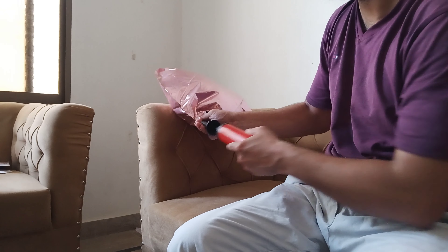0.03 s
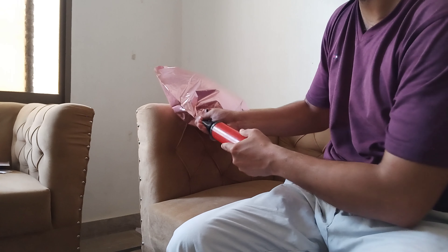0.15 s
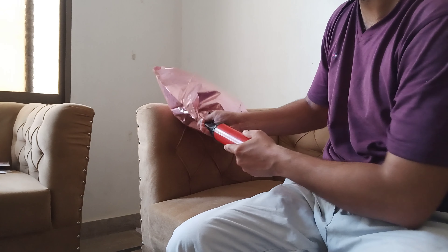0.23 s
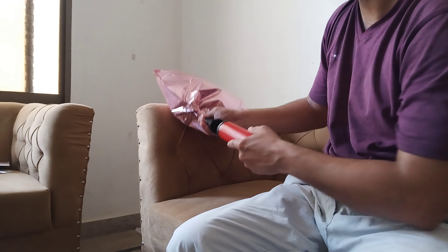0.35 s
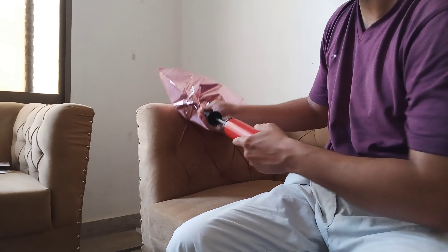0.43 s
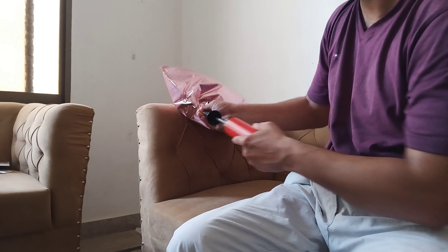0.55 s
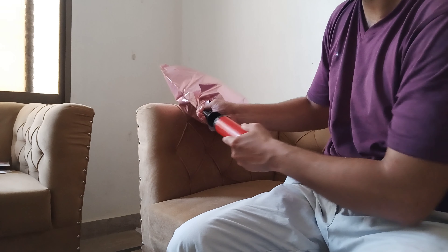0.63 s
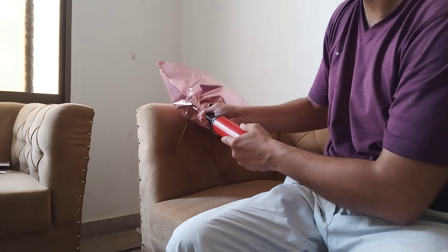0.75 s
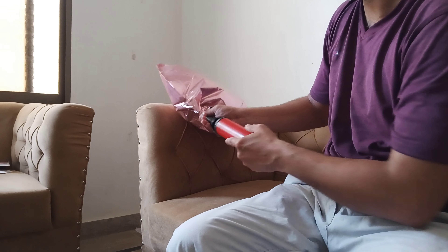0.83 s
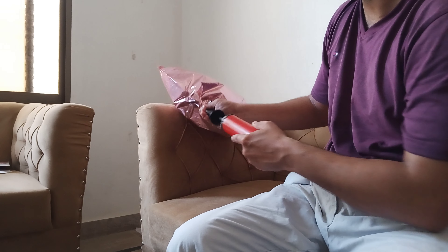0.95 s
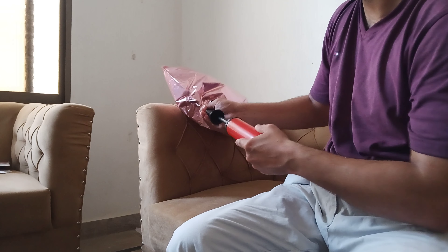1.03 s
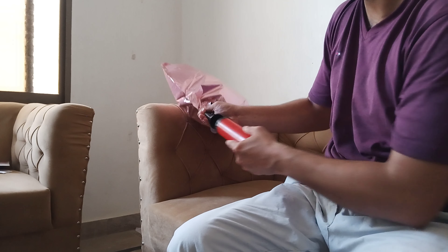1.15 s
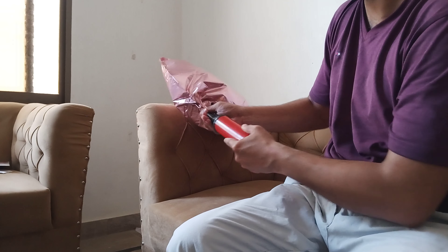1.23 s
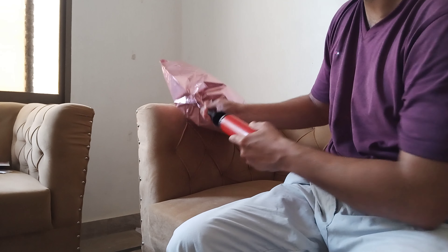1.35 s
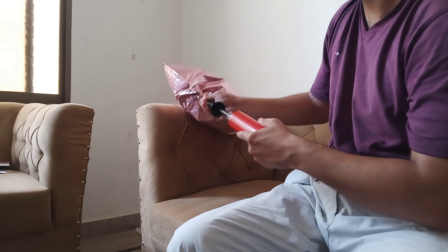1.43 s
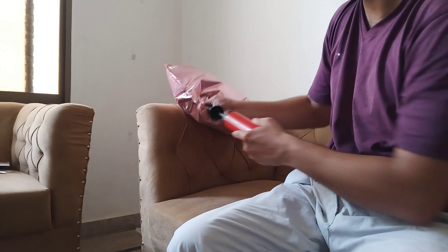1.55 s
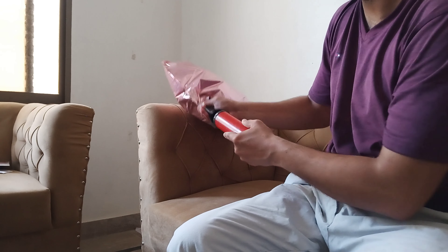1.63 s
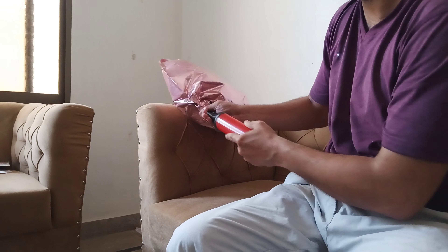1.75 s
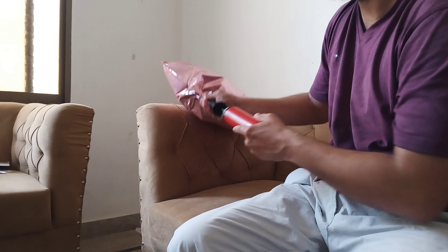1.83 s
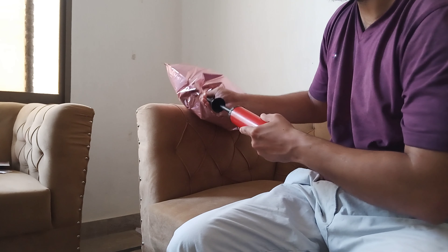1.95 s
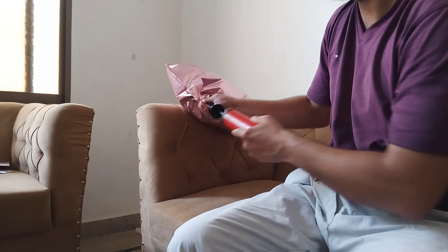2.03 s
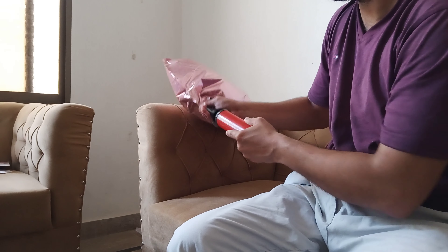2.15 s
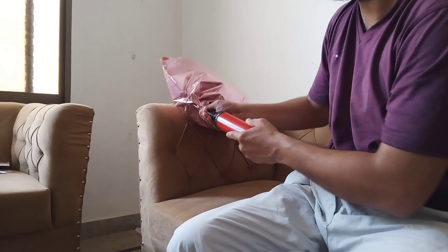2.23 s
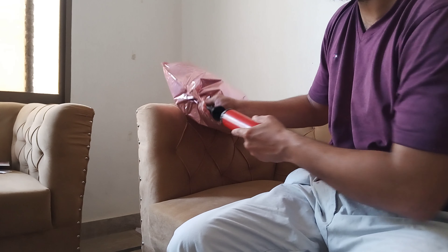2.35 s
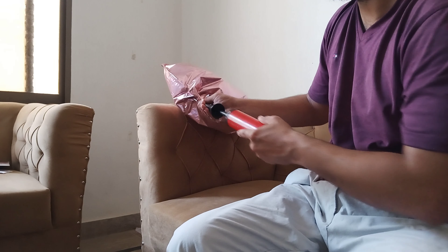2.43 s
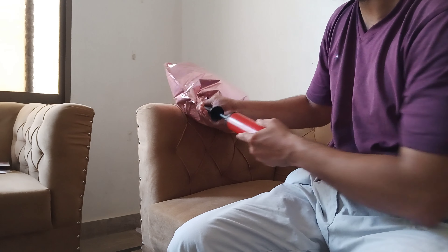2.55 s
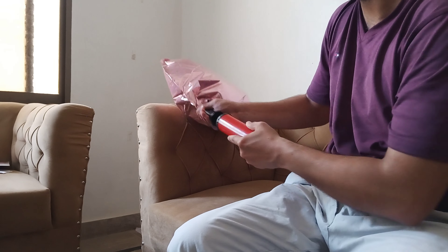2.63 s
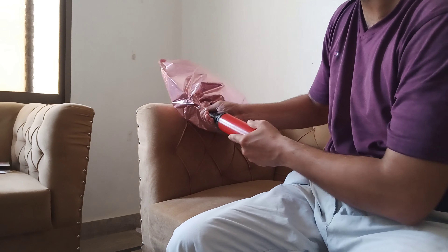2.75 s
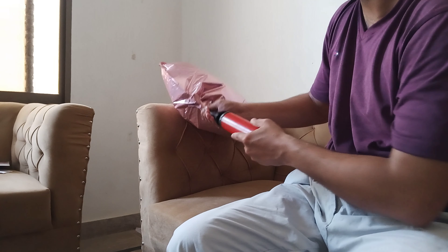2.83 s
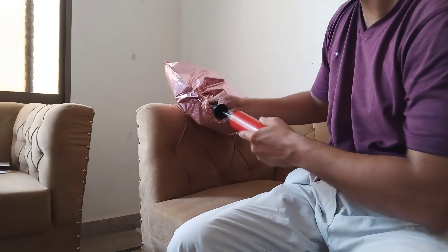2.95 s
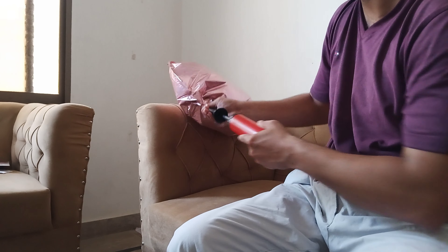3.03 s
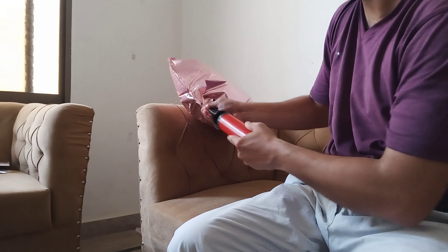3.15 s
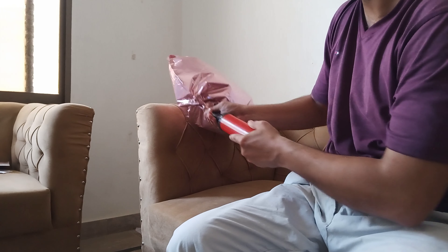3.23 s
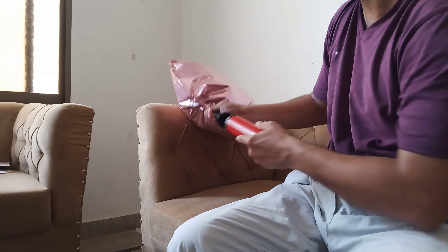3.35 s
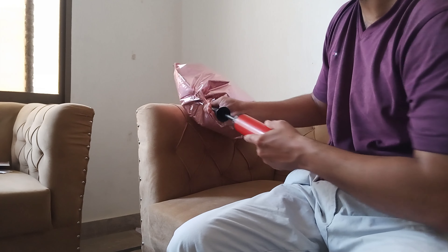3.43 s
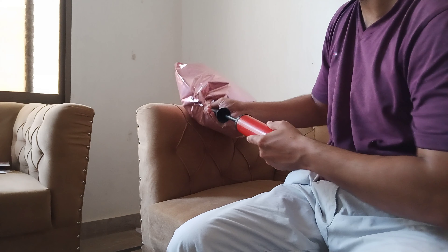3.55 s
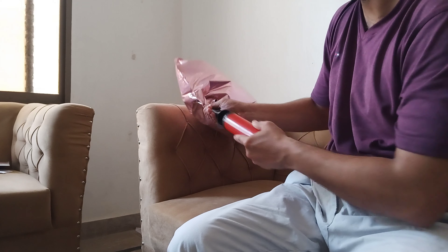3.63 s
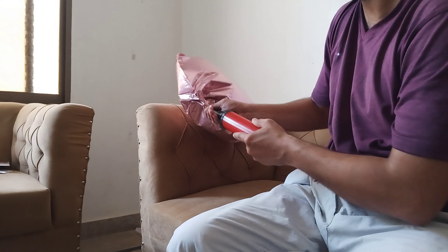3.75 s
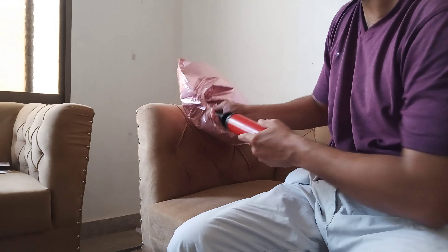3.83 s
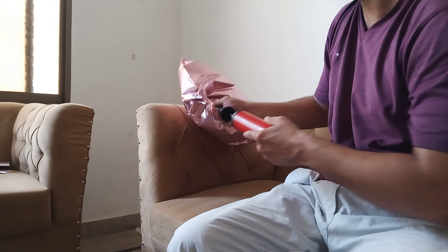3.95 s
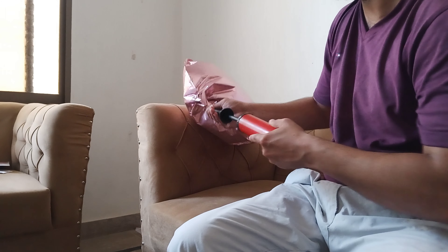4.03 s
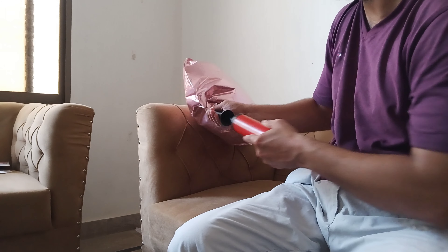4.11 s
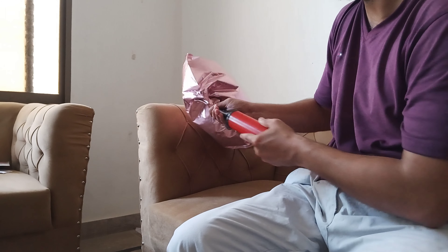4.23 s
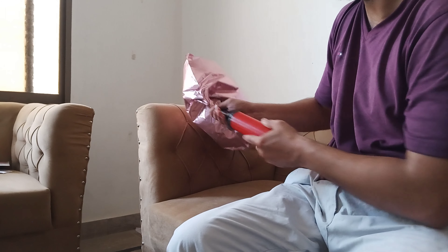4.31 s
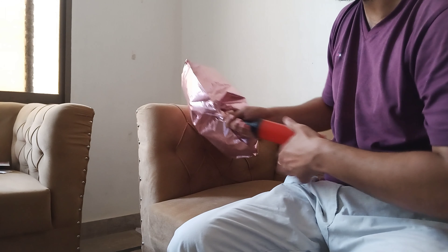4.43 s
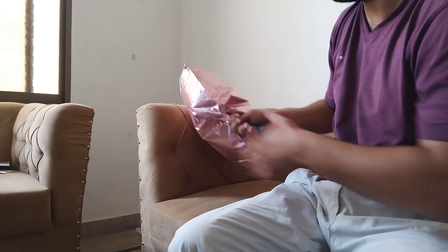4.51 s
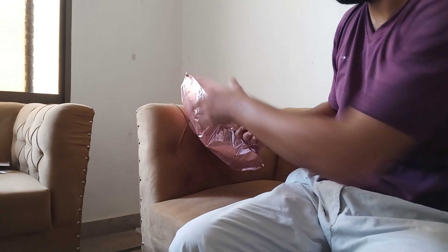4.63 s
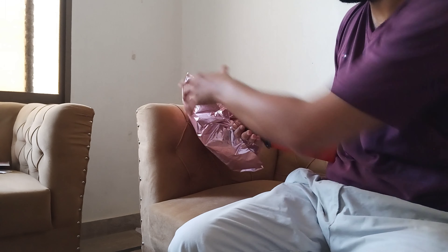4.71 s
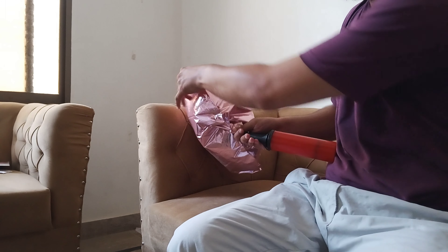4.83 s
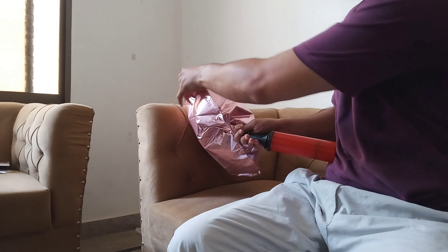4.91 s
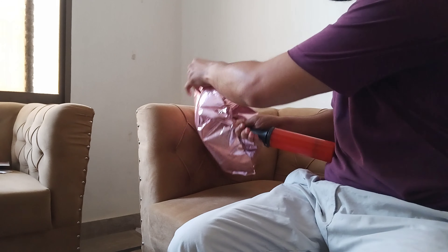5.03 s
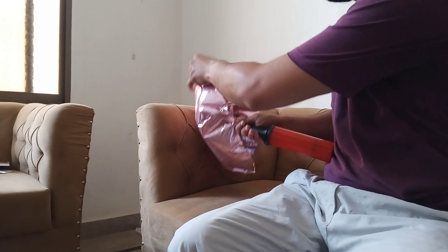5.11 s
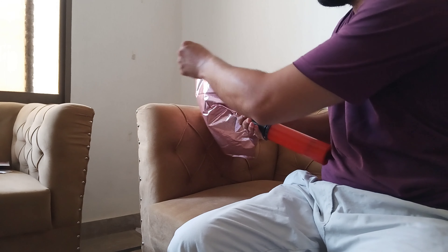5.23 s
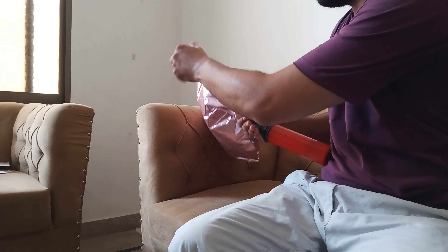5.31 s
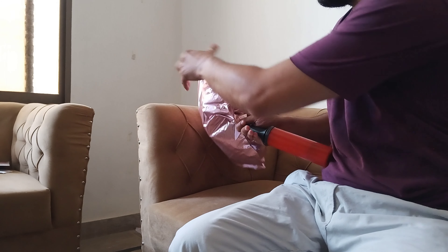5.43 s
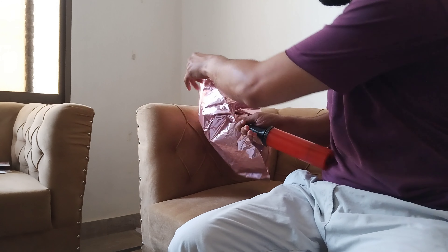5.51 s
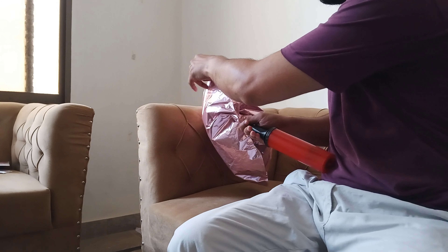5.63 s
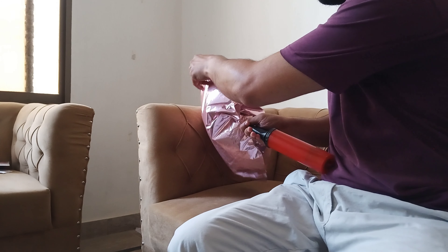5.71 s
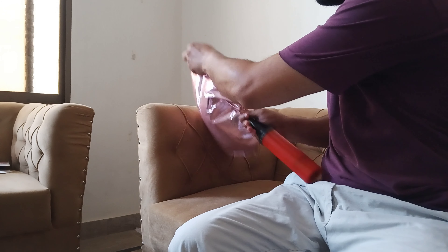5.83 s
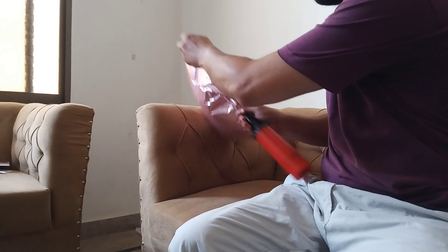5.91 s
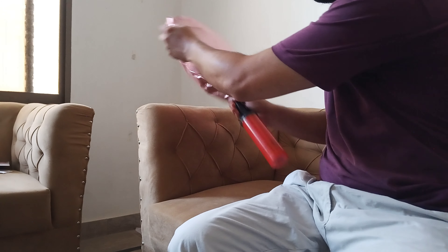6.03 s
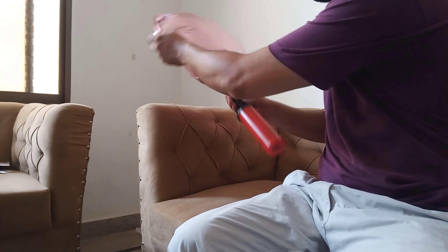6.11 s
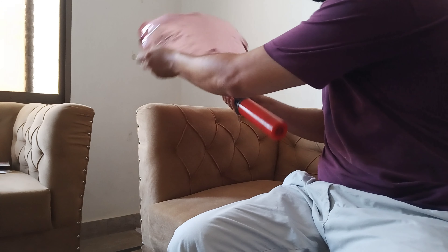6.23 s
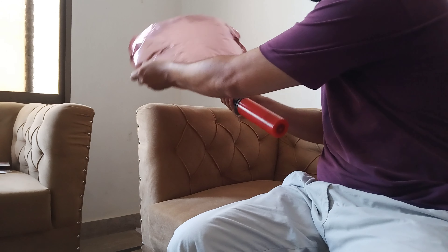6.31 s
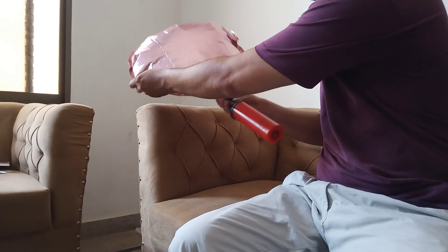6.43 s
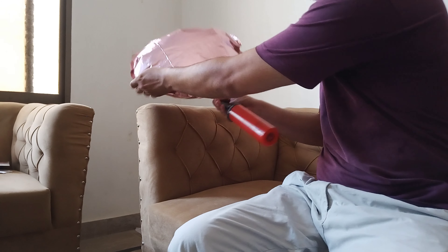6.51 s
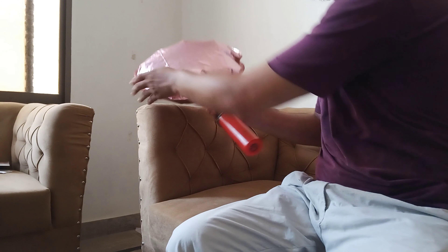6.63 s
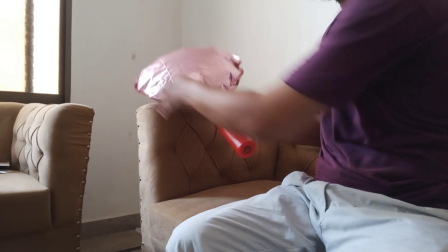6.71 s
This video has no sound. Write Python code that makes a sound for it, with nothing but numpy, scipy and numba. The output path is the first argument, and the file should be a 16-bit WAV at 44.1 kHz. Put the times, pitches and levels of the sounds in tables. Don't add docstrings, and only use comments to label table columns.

```python
import sys
import numpy as np
from scipy import signal
from scipy.fft import rfft, irfft, next_fast_len
from scipy.io import wavfile
from scipy.ndimage import uniform_filter1d
from numba import njit

SR = 44100
rng = np.random.default_rng(int(sys.argv[2]) if len(sys.argv) > 2 else 0)


def wrap_up_sound(samples):
    columns = np.atleast_2d(samples).T
    tamed = np.clip(columns, -1, 1)
    steps = np.round(tamed * 32767).astype(np.int16)
    wavfile.write(sys.argv[1], SR, steps)


def voltage_ratio(level):
    return 10 ** (np.asarray(level, float) / 20)


N = 298557
TIME = np.arange(N) / SR
PUMP_ENDS_S = 4.25


# frequency in Hz, density in dB per Hz.
JET_SPECTRUM = [(120, -46), (235, -5.5), (380, -11), (790, -5), (1090, -12.5), (1570, -6.5), (3200, -2),
                (6000, -1), (16000, -4)]
# middle in s, length in s, pitch in Hz, level in dB over jet.
LOW_CAVITY = [(0.005, 0.052, 580, 14), (0.205, 0.13, 600, 18), (0.277, .04, 600, -1),
              (0.329, 0.026, 1010, 12), (0.362, 0.023, 520, -3), (0.41, 0.072, 472, 17),
              (0.856, .12, 808, 14.5), (1.193, 0.075, 700, 12.5), (1.285, 0.037, 613, 9.5),
              (1.355, 0.092, 780, 3.5), (1.66, 0.059, 520, 11), (1.79, 0.03, 845, 8),
              (1.82, 0.2, 1000, 6.5), (2.284, .08, 804, 10), (2.397, 0.12, 750, 7), (2.81, 0.063, 875, 0),
              (2.884, 0.058, 990, 5), (3.238, 0.069, 564, 16.5), (3.403, 0.07, 850, 7.5),
              (3.853, 0.088, 910, 4.5), (4.2, 0.099, 592, 14.5)]
# middle in s, length in s, pitch in Hz, level in dB over jet.
HIGH_CAVITY = [(.19, 0.07, 1500, 12.5), (.35, 0.11, 1520, 0.5), (.86, 0.17, 1560, 4.5),
               (1.225, .03, 1800, 12.5), (1.26, 0.038, 1900, 7), (1.37, 0.22, 1440, -2),
               (1.81, 0.097, 1730, 2.5), (2.28, 0.23, 1600, 5), (2.801, 0.14, 1380, 3),
               (3.24, 0.046, 1800, 14.5), (3.27, .03, 1730, 10.5), (3.35, 0.26, 1240, -2),
               (3.41, 0.22, 1330, 5), (3.88, 0.15, 1240, 7.5), (3.97, 0.089, 1360, -0.5),
               (4.12, 0.16, 1290, 10)]
# middle in s, length in s, pitch in Hz, level in dB over jet.
NOZZLE_CAVITY = [(.37, 0.15, 4420, -1.5), (.86, .1, 4020, -2.5), (1.3, 0.073, 2590, 0.5),
                 (1.765, 0.041, 2900, -6), (1.828, 0.069, 3880, -8), (2.307, 0.14, 4250, -6),
                 (2.82, 0.072, 3700, -5.5), (3.293, 0.027, 2900, -3), (3.364, 0.073, 4200, -5),
                 (3.796, 0.018, 2930, 7), (3.88, .12, 4360, -6)]
# frequency in Hz, width in Hz, level in dB.
INLET_MODES = [
    (2240, 680, -11),
    (4250, 1100, -8),
    (6400, 1600, -4.5),
]


def pump():
    eddies = grains(3000, 4.6, .12) * voltage_ratio(1.0 * walk(150) + 1.5 * walk(45))
    boom = air(push_db=-11.5, pull_db=-18, after_db=1.5, dying=0.77) * colour(eddies, JET_SPECTRUM, 370, 1190)
    body = air(push_db=-7.5, pull_db=-10, after_db=-3, dying=0.85) * colour(eddies, JET_SPECTRUM, 1040, 2660)
    lows = voltage_ratio(-4.5) * boom + voltage_ratio(-2.5) * body
    low_rings = rings(lows, LOW_CAVITY, wander=.033, width_hz=76.0)
    high_rings = rings(lows, HIGH_CAVITY, wander=0.052, width_hz=210.0)
    lows = lows + low_rings + high_rings

    jet = air(push_db=0, pull_db=-1, after_db=1.5, dying=1) * colour(eddies, JET_SPECTRUM, 3153, 8070)
    jet += rings(jet + lows, NOZZLE_CAVITY, wander=0.048, width_hz=290.0)
    top = voltage_ratio(3.6 * walk(40)) * colour(eddies, JET_SPECTRUM, 8210, 30000)
    top = air(push_db=-11.5, pull_db=-13, after_db=-15.5, dying=1.17) * top

    breath = colour(rng.standard_normal(N), JET_SPECTRUM, 1500, 8000)
    inlet = np.zeros(N)
    for hz, width_hz, db in INLET_MODES:
        inlet += voltage_ratio(db) * unit_rms(band_pass(breath, hz * (1 + .02 * walk(15)), 1. * width_hz))
    inlet = air(push_db=-31, pull_db=-1.9, after_db=-30, dying=2) * inlet
    return room(jet + inlet + lows + top, wet_db=-8.5)


# full speed in s, held in s, hiss in dB, rising slope in dB/s, dying slope in dB/s.
PULLS = [
    (.03, 0.16, -33, 110, 270),
    (.61, 0.046, -31, 220, 150),
    (1.061, 0.06, -28, 350, 145),
    (1.535, 0.076, -28.5, 270, 170),
    (1.735, .012, -37.5, 560, 300),
    (2.05, 0.052, -33, 190, 174),
    (2.55, 0.067, -39, 200, 140),
    (3.069, 0.069, -27.5, 230, 220),
    (3.579, 0.082, -31.5, 250, 300),
]
# valve pop in s, held in s, jet in dB, dying slope in dB/s, jump at the pop in dB.
PUSHES = [
    (0.294, 0.093, -18, 250, 7),
    (0.809, 0.084, -15, 300, 3),
    (1.271, 0.075, -11, 261, 5.5),
    (1.756, 0.1, -14, 293, 12),
    (2.267, 0.085, -15, 315, 12.5),
    (2.375, 0.056, -30.5, 1600, 2.5),
    (2.781, 0.073, -14.5, 275, 15),
    (3.282, 0.078, -12, 248, 9),
    (3.801, 0.096, -14, 286, 11),
]


def air(push_db=0, pull_db=0, after_db=0, dying=1):
    rise_s, rise_db_s = 0.024, 501.5
    flow = sum(voltage_ratio(stroke(s, held, db + pull_db, rise, fall)) for s, held, db, rise, fall in PULLS)
    for s, held, db, fall, _ in PUSHES:
        flow += voltage_ratio(stroke(s + rise_s, held, db + push_db, rise_db_s, dying * fall))
    last_s = PUSHES[-1][0] + PUSHES[-1][1]
    sigh = every_sample(voltage_ratio(stroke(last_s, held=0.085, db=-43, rise=rise_db_s, fall=79)))
    leak = voltage_ratio(-55.5) * (TIME < last_s)
    flow = every_sample(flow) + voltage_ratio(after_db) * (sigh + leak)
    return flow * voltage_ratio(valve()) * (TIME < PUMP_ENDS_S)


def valve():
    db = np.zeros(N)
    for s, *_, jump_db in PUSHES:
        db += jump_db * np.tanh((TIME - s) / 0.0027) * np.exp(-np.abs(TIME - s) / 0.012) / 2
    return db


def rings(x, table, wander, width_hz):
    middle_s, length_s, hz, db = np.transpose(table)
    gain = np.zeros(N)
    for middle, length, ring_db in zip(middle_s, length_s, db):
        gain += voltage_ratio(ring_db) * np.exp(-(2 * (TIME - middle) / length) ** 2)
    pitch_hz = np.interp(TIME, middle_s, hz) * (1 + wander * walk(30))
    return gain * band_pass(x, pitch_hz, width_hz)


# frequency in Hz, density in dB per Hz.
FOIL_SPECTRUM = [(200, -27.5), (430, -0.5), (980, -6), (1830, -7), (3500, -5.5), (6000, -8), (16000, -10)]
# start in s, peak in dB, centre in Hz.
SNAPS = [(.1765, -25, 6400), (.194, -23, 5500), (.245, -31, 5600), (1.685, -30, 6200), (.7275, -24, 6500),
         (1.676, -27, 3800), (2.187, -32, 3600), (2.199, -27, 4100), (2.2455, -30, 5300),
         (2.719, -31, 5400), (2.7242, -26, 5700), (2.741, -31, 5430), (3.2278, -27, 6000),
         (3.7622, -30, 6200), (4.2125, -38, 5800), (4.3496, -45, 6000), (4.3625, -46, 5500),
         (4.4037, -45, 5950), (4.4185, -46, 5000), (4.4407, -44, 4180), (4.4476, -45, 6200),
         (4.4539, -46, 4600), (4.4833, -46, 5200), (4.508, -47, 5900), (4.5735, -37, 4030),
         (4.578, -46, 6500), (4.586, -42, 4600), (4.595, -43, 5500), (4.606, -38, 6310),
         (4.6493, -31, 4600), (4.6957, -33, 6000), (4.6999, -27, 5300), (4.794, -35, 6000),
         (4.8722, -35, 5300), (5.0809, -46, 5500), (5.1346, -50, 5200), (5.2048, -39, 6600),
         (5.211, -43, 6600), (5.2623, -42, 4300), (5.3366, -44, 7200), (5.452, -41, 4000),
         (5.481, -37, 6060), (5.64, -36, 4020), (5.6575, -39, 5860), (5.731, -39, 5900),
         (5.8206, -38, 5000), (5.8875, -42, 6100), (6.1548, -41, 5940), (6.1646, -41, 5500),
         (6.323, -51, 5500), (6.3919, -49, 6460), (6.4084, -49, 6630), (6.466, -46, 6020),
         (6.514, -44, 6310), (6.6, -45, 3500), (6.6455, -43, 6200), (6.655, -44, 6300), (6.7246, -44, 5300)]
# start in s, peak in dB.
CRACKS = [(.5449, -42), (1.6827, -43), (2.2168, -42), (2.5076, -42), (2.7245, -45), (2.7416, -44),
          (3.2283, -42), (3.7625, -40), (4.1645, -54), (4.213, -49), (4.234, -57), (4.339, -64),
          (4.3628, -63), (4.4167, -62), (4.4481, -52), (4.4851, -57), (4.5738, -59), (4.578, -59),
          (4.587, -57), (4.6962, -45), (4.7002, -43), (5.0812, -67), (5.2051, -58), (5.2111, -55),
          (5.2628, -57), (5.3371, -54), (5.7315, -55), (6.3004, -68), (6.3922, -66), (6.5665, -53),
          (6.6433, -54), (6.726, -61), (6.7336, -60), (6.7675, -61)]


def foil():
    crinkle = grains(1200, 4.5, 0.2) * voltage_ratio(2.8 * walk(70) + 1.5 * walk(37))
    middle = voltage_ratio(0.47 * walk(36)) * colour(crinkle, FOIL_SPECTRUM, 2270, 4160)
    bright = voltage_ratio(4.5 + 1.8 * walk(26)) * colour(crinkle, FOIL_SPECTRUM, 4630, 8000)
    low = voltage_ratio(-6 + 1.9 * walk(25)) * colour(grains(300, 1.8, .2), FOIL_SPECTRUM, 360, 2160)
    top = voltage_ratio(-14 + 2.5 * walk(60)) * colour(crinkle, FOIL_SPECTRUM, 8170, 30000)
    out = hands() * voltage_ratio(-0.56) * (voltage_ratio(-6.5) * (middle + bright) + low + top)
    for s, peak_db, hz in SNAPS:
        add_ring(out, s, peak_db + 9, hz, .004)
        add_ring(out, s, peak_db + 2, 0.7 * hz, .0035)
    for s, peak_db in CRACKS:
        for hz in (9300, 11800, 14900):
            add_ring(out, s - .0004, peak_db + 10, hz, .002, rise_s=.0001)
    return out


# full grip in s, held in s, rustle in dB, rising slope in dB/s, dying slope in dB/s.
GRIPS = [(4.17, 0.064, -50, 100, 590), (4.4, 0.048, -55.5, 110, 170), (4.59, .012, -56.5, 900, 91),
         (4.612, 0.067, -44.5, 870, 59), (4.7, 0.017, -46.5, 170, 190), (4.78, 0.1, -50.5, 144, 180),
         (5.207, .02, -51.5, 2500, 47), (5.39, 0.036, -56.5, 150, 110), (5.455, 0.018, -61, 700, 95),
         (5.49, 0.051, -44, 320, 46), (5.77, 0.032, -53.5, 96, 120), (5.94, 0.054, -50.5, 140, 107),
         (6.025, 0.031, -48.5, 250, 200), (6.17, .075, -54, 220, 500), (6.525, .15, -52, 100, 330),
         (6.732, .05, -54.5, 900, 100)]


def hands():
    return every_sample(sum(voltage_ratio(stroke(*grip)) for grip in GRIPS))


# start in s, peak in dB, ring in Hz, upper ring in dB re peak,
# upper ring in Hz.
KNOCKS = [(.159, -19.5, 1920, 7, 4250), (.1625, -19, 626, -4, 4040), (.2445, -23, 2000, 0, 2950),
          (.901, -6.5, 770, -11.5, 5910), (1.2069, -13.5, 1600, -6, 3400), (1.226, -18.5, 1760, -7, 3350),
          (1.231, -27.5, 1770, -9, 5340), (1.638, -23.5, 725, -13.5, 3390), (1.684, -15.5, 1520, -5, 3520),
          (3.176, -24, 1580, -9, 3500), (3.181, -24.5, 690, -6.5, 3440), (3.227, -15, 1570, -5, 3780),
          (3.247, -22.5, 1840, -9, 3850), (3.792, -16.5, 2870, -2, 4090)]
# start in s, peak in dB.
RATTLES = [
    (6.7328, -41),
    (6.749, -51),
    (6.768, -47),
]
# start in s, peak in dB, ring in Hz.
THUMPS = [
    (.161, -35, 310),
    (.43, -32, 223),
    (0.901, -19.5, 434),
    (1.372, -24.5, 302),
    (1.845, -25, 269),
    (2.888, -35, 297),
    (1.633, -33.5, 200),
    (3.173, -30.5, 238),
    (3.389, -33.5, 343),
    (4.23, -41, 284),
]


def knocks():
    out = np.zeros(N)
    for s, db, hz, upper_db, upper_hz in KNOCKS:
        add_ring(out, s, db + 1.5, hz, .012, rise_s=.0006)
        add_ring(out, s, db - 1.5, 1.25 * hz, .009, rise_s=.0006)
        add_ring(out, s + .0004, db + upper_db + 3.5, upper_hz, .007, rise_s=.0005)
        add_ring(out, s, db + upper_db - 1.0, 1.5 * upper_hz, .003)
    for s, db in RATTLES:
        add_ring(out, s, db + 3.5, 3060, .018, rise_s=.0009)
        add_ring(out, s, db + 2.5, 3900, .016, rise_s=.0009)
    for s, db, hz in THUMPS:
        add_ring(out, s, db, hz, .06, rise_s=0.0013)
    return room(out, wet_db=-9)


def balloon():
    start_s, sag_db_s = 4.04, 17
    hz = np.full(N, 300.)
    db = every_sample(stroke(start_s, held=0.46, db=-56, rise=250, fall=386))
    db = db - sag_db_s * np.maximum(TIME - start_s, 0)
    stir = unit_rms(band_pass(band_pass(rng.standard_normal(N), hz, 35.), hz, 35.))
    tone = np.sin(2 * np.pi * np.cumsum(hz * (1 + .03 * walk(12))) / SR)
    return voltage_ratio(db) * (.6 * stir + 1.1 * tone)


# middle in s, length in s, level in dB.
CHIRPS = [(4.645, .03, -57), (4.71, .05, -56), (4.77, .04, -60), (4.83, .05, -59), (4.92, 0.037, -57.5),
          (4.98, 0.034, -58), (5.027, .035, -76), (5.093, 0.047, -69.5), (5.148, 0.038, -66.5),
          (5.21, 0.042, -56.5), (5.257, 0.042, -65), (5.318, 0.055, -66), (5.372, .04, -64),
          (5.517, 0.036, -62), (5.593, .04, -57), (5.718, .045, -57), (5.79, .075, -54.5),
          (5.9, .04, -62.5), (5.935, .04, -59), (6.09, 0.07, -58), (6.145, 0.045, -67), (6.24, 0.05, -61),
          (6.305, 0.037, -66.5)]
# time in s, frequency in Hz.
CHIRP_PITCH = [(4.6, 3080), (5.12, 3068), (5.135, 3150), (5.4, 3155), (5.6, 3080), (5.8, 3095),
               (6.05, 3068), (6.35, 3062)]


def cricket():
    size = np.zeros(N)
    for s, length, db in CHIRPS:
        away = np.abs(TIME - s)
        pulse = np.clip(1.5 - 3 * away / length, 0, 1)
        echo = 0.2 * np.exp(-away / 0.06)
        size += voltage_ratio(db + 1.5) * (pulse + echo)
    flutter = voltage_ratio(2.5 * walk(160))
    pitch_s, pitch_hz = np.transpose(CHIRP_PITCH)
    hz = np.interp(TIME, pitch_s, pitch_hz)
    return size * flutter * np.sin(2 * np.pi * np.cumsum(hz) / SR)


# frequency in Hz, density in dB per Hz.
FLOOR_SPECTRUM = [(250, -2), (690, -6.5), (870, -4), (1840, -12.5), (6000, -16), (16000, -20.5)]
# frequency in Hz, density in dB per Hz.
RUMBLE_SPECTRUM = [(18, -61), (30, -34.5), (46, -10.5), (59, 0), (108, 0.5), (123, -5.5), (151, 0.5),
                   (207, -3), (283, -2), (312, -2.5), (379, -4.5), (400, 2.5), (520, -39), (880, -120)]
# start in s, rumble in dB.
SHOVES = [(.02, -61), (.17, -46), (.43, -39), (.66, -56), (.9, -39), (1.18, -48.5), (1.38, -41.5),
          (1.64, -48.5), (1.87, -40), (2.2, -47), (2.4, -42), (2.89, -46), (3.05, -53), (3.27, -50),
          (3.41, -38.5), (3.92, -40), (4.65, -61), (6.2, -64)]


def house():
    effort = voltage_ratio(-61.5) + voltage_ratio(-56) * (TIME < PUMP_ENDS_S)
    effort = effort + voltage_ratio(-7.5) * uniform_filter1d(hands(), SR // 10)
    effort += every_sample(sum(voltage_ratio(stroke(s, 0.018, db, 120, 130)) for s, db in SHOVES))
    rumble = effort * voltage_ratio(-4.5 + walk(10)) * colour(rng.standard_normal(N), RUMBLE_SPECTRUM, 110, 385)
    deep = effort ** 0.62 * voltage_ratio(-28.5) * colour(rng.standard_normal(N), RUMBLE_SPECTRUM, 13, 123)
    return rumble + deep + voltage_ratio(-60.5) * colour(rng.standard_normal(N), FLOOR_SPECTRUM, 350, 30000)


def room(x, wet_db):
    t60_s = 0.27
    t = np.arange(SR // 2) / SR
    tail = rng.standard_normal(len(t)) * voltage_ratio(-60 * t / t60_s) * (t > .003)
    wet = signal.fftconvolve(x, tail / np.sqrt(np.sum(tail ** 2)))[:N]
    return (x + voltage_ratio(wet_db) * wet) / np.sqrt(1 + voltage_ratio(2 * wet_db))


def add_ring(out, s, db, hz, t60, rise_s=0.00028):
    start = int(s * SR)
    t = np.arange(min(int(t60 * SR), N - start)) / SR
    swell = 1 - np.exp(-(t / rise_s) ** 2)
    out[start:][:len(t)] += voltage_ratio(db - 60 * t / t60) * swell * np.sin(2 * np.pi * hz * t)


def stroke(s, held, db, rise, fall):
    t, knee_db = np.arange(0, N, 16) / SR, 2.5
    before = np.logaddexp(0, rise * (s - t) / knee_db)
    after = np.logaddexp(0, fall * (t - s - held) / knee_db)
    return db - knee_db * (before + after)


def every_sample(x):
    return np.interp(np.arange(N), np.arange(0, N, 16), x)


def grains(rate, spread_db, share):
    size_db = spread_db * np.minimum(rng.exponential(size=N), 3)
    clicks = (rng.random(N) < rate / SR) * voltage_ratio(size_db) * np.sign(rng.standard_normal(N))
    share = np.clip(share, 0, 1)
    return np.sqrt(1 - share) * rng.standard_normal(N) + np.sqrt(share) * unit_rms(clicks)


def walk(rate):
    hold = max(int(SR / rate), 1)
    steps = np.repeat(rng.standard_normal(N // hold + 1), hold)
    return 0.7 * uniform_filter1d(uniform_filter1d(steps, hold), hold)[:N]


@njit
def band_pass(x, hz, width):
    y, band, low = np.empty(len(x)), 0., 0.
    for i in range(len(x)):
        g, k = np.tan(np.pi * hz[i] / SR), width / hz[i]
        v = (band + g * (x[i] - low)) / (1 + g * (g + k))
        band, low, y[i] = 2 * v - band, low + 2 * g * v, k * v
    return y


def unit_rms(x):
    return x / np.sqrt(np.mean(x ** 2))


# frequency in Hz, gain in dB.
MIC_RESPONSE = [(3000, 1.5), (5000, 2.5), (6500, 7), (7300, 0), (8000, -9), (10000, -12), (13700, -20),
                (14300, -12), (15000, -5), (15500, -9), (15800, -38.5)]


def colour(x, spectrum, lo_hz, hi_hz):
    size = next_fast_len(N)
    f = np.arange(1, size // 2 + 2) * SR / size
    gain_db = np.zeros(len(f))
    for curve in (spectrum, MIC_RESPONSE):
        hz, db = np.transpose(curve)
        gain_db += np.interp(np.log(f), np.log(hz), db)
    above_lo = np.clip(.5 + 2 * np.log2(f / lo_hz), 0, 1)
    above_hi = np.clip(.5 + 2 * np.log2(f / hi_hz), 0, 1)
    window = np.sqrt(above_lo - above_hi)
    return unit_rms(irfft(rfft(x, size) * voltage_ratio(gain_db) * window, size)[:N])


def scene():
    return np.tile(pump() + foil() + knocks() + cricket() + house() + balloon(), (2, 1))


def low_pass(x):
    return signal.sosfilt(signal.butter(12, 16790, fs=SR, output="sos"), x)


def record(dry):
    rounded = dry / (1 + np.abs(dry) ** 8) ** (1 / 8)
    top_cut = signal.ellip(8, .2, 60, 15750, fs=SR, output="sos")
    mix = 0.91 * signal.sosfilt(top_cut, rounded)
    return low_pass(mix)


dry = scene()
out = record(dry)
wrap_up_sound(out)
```